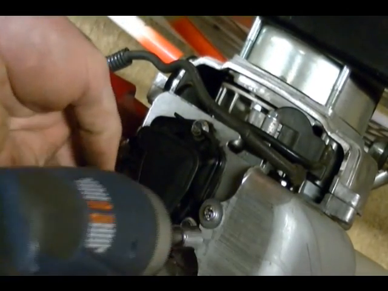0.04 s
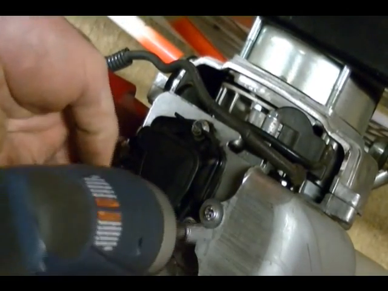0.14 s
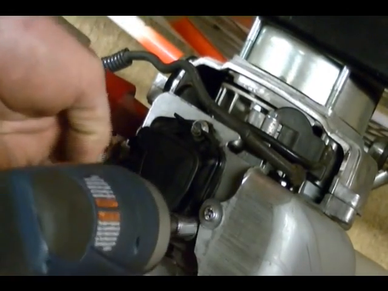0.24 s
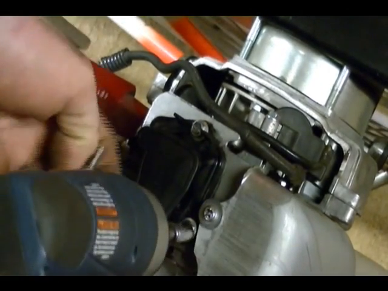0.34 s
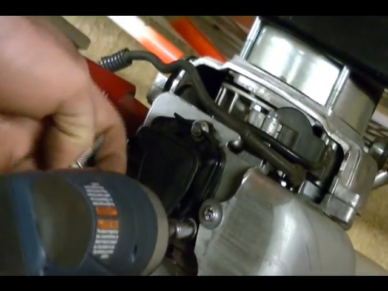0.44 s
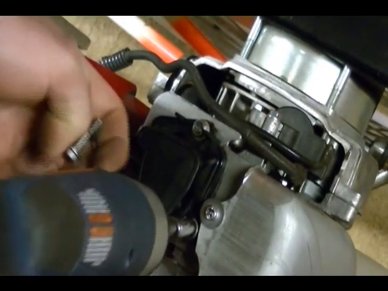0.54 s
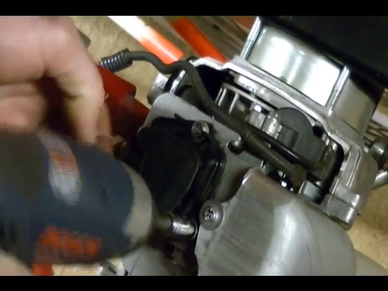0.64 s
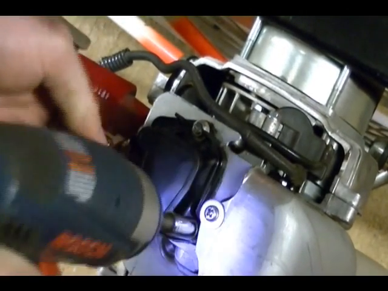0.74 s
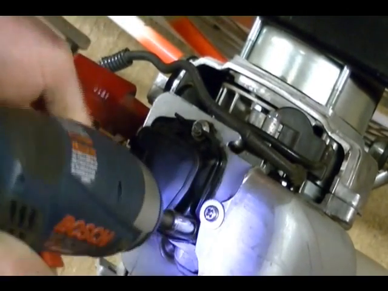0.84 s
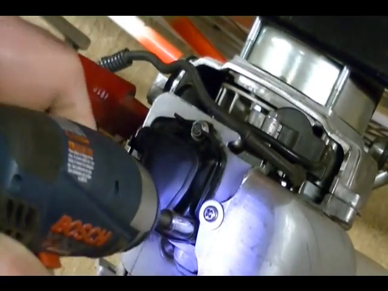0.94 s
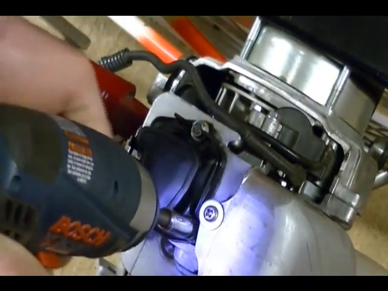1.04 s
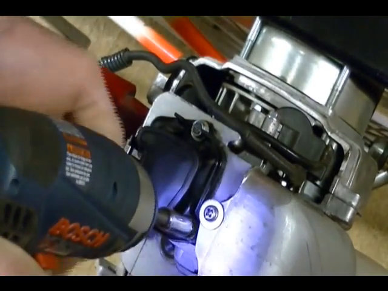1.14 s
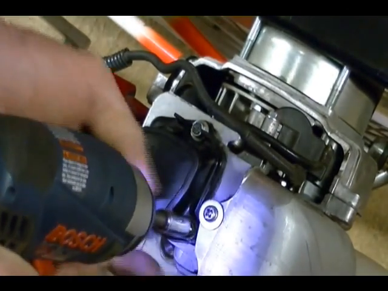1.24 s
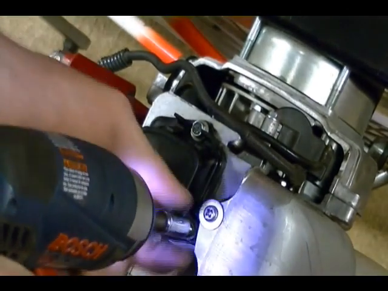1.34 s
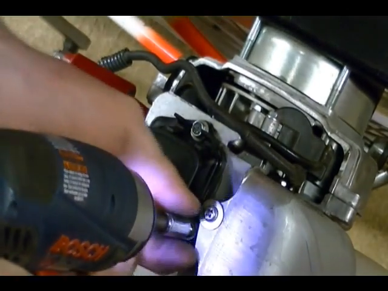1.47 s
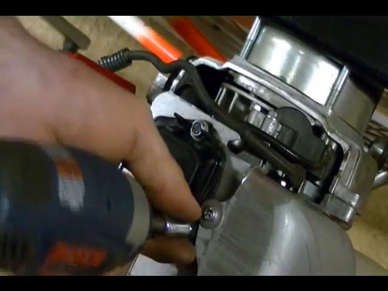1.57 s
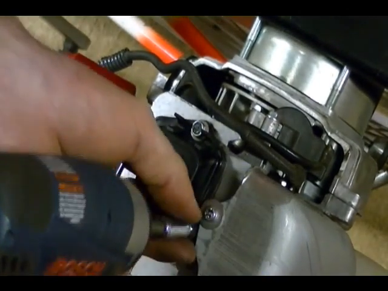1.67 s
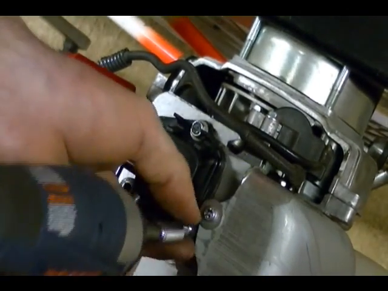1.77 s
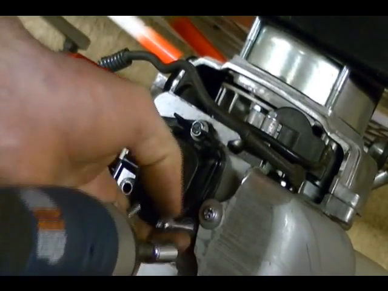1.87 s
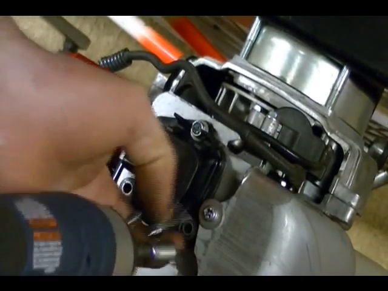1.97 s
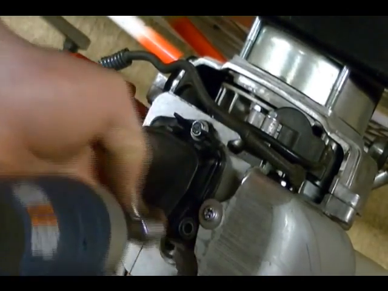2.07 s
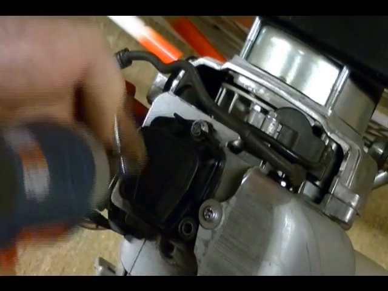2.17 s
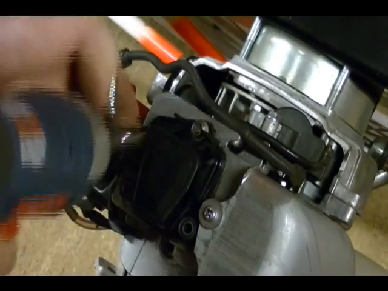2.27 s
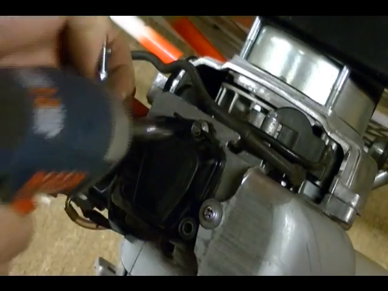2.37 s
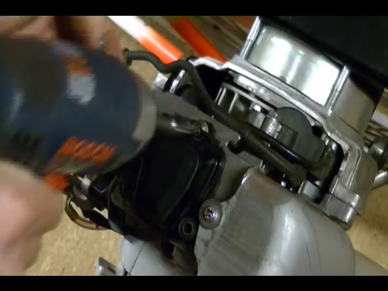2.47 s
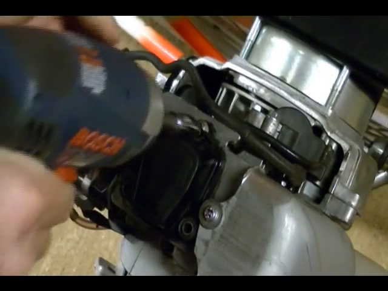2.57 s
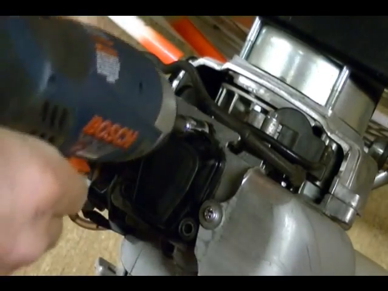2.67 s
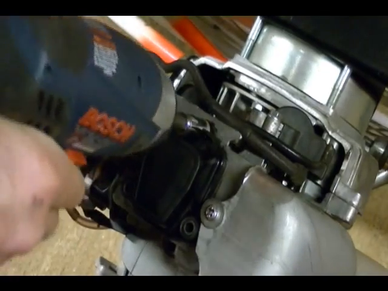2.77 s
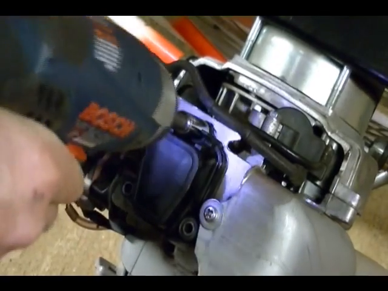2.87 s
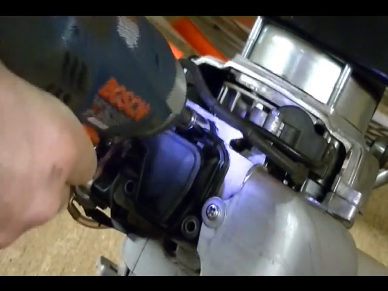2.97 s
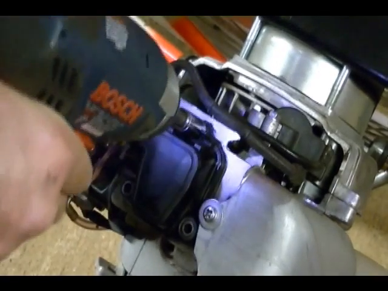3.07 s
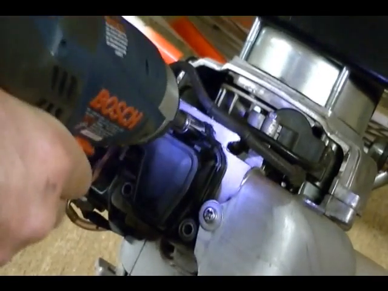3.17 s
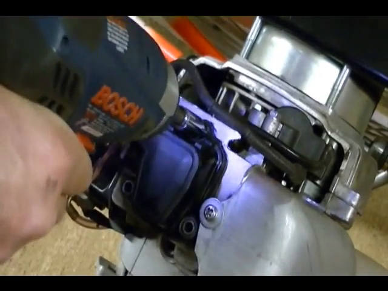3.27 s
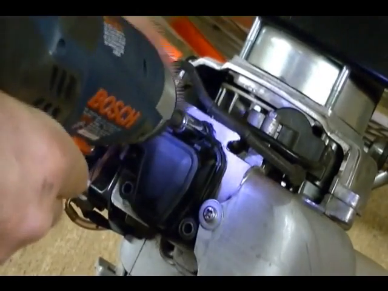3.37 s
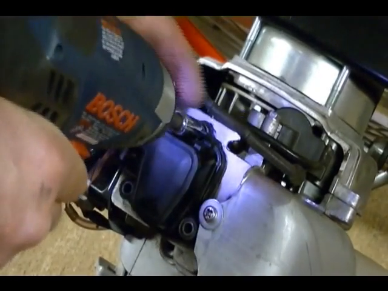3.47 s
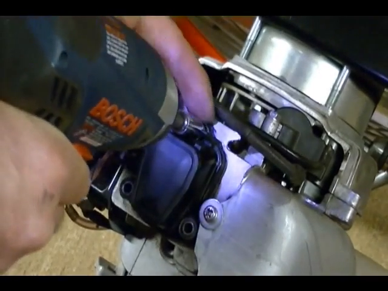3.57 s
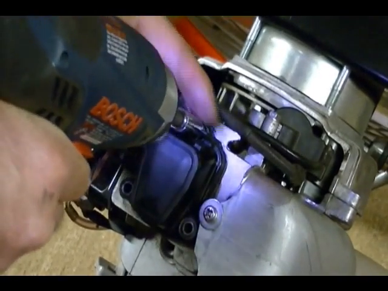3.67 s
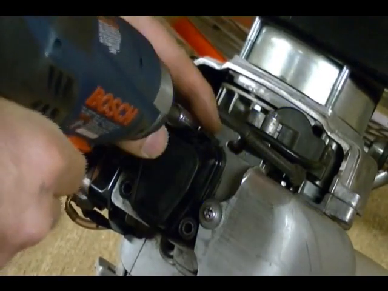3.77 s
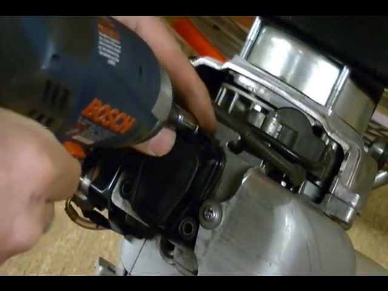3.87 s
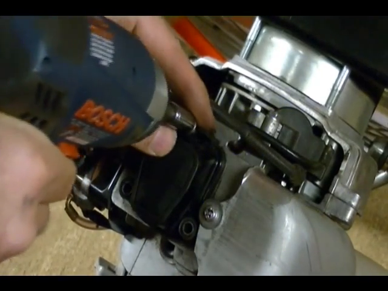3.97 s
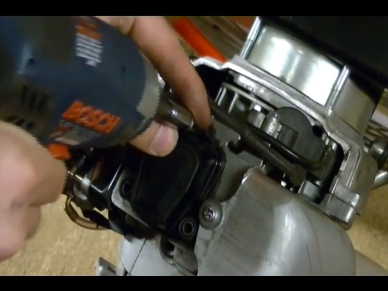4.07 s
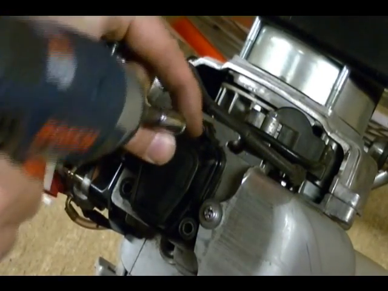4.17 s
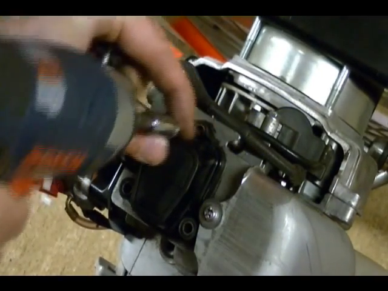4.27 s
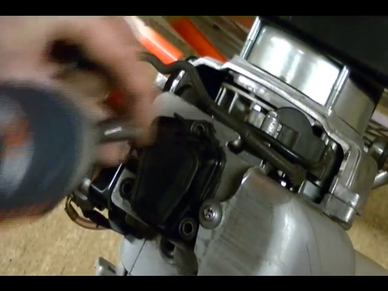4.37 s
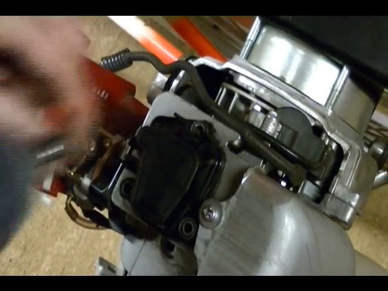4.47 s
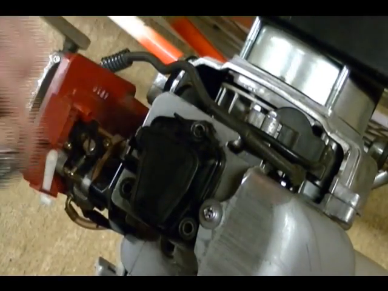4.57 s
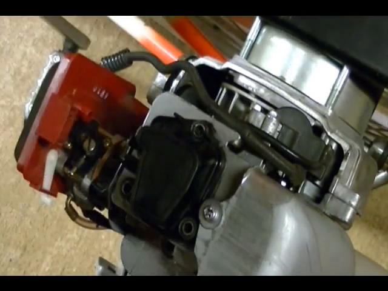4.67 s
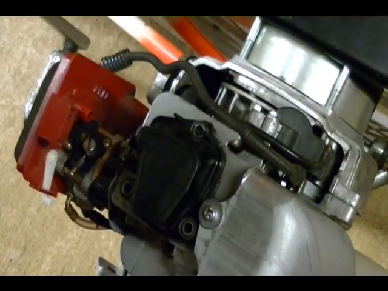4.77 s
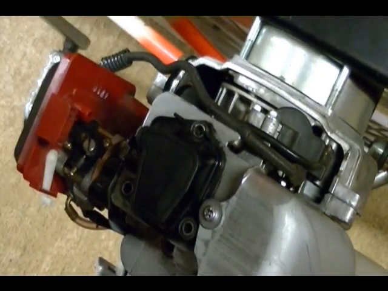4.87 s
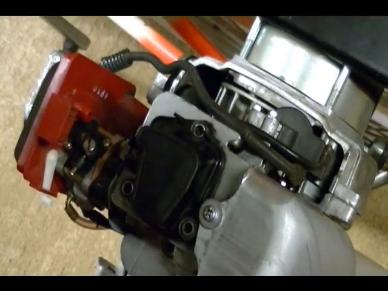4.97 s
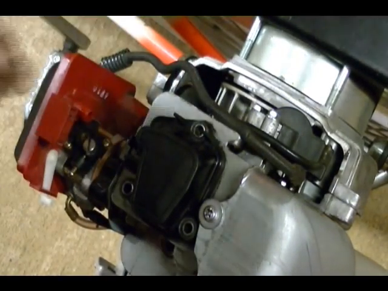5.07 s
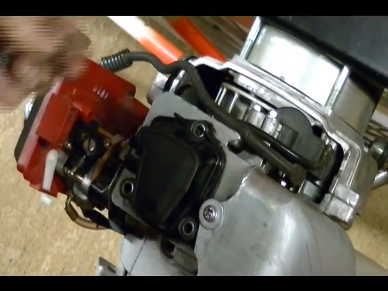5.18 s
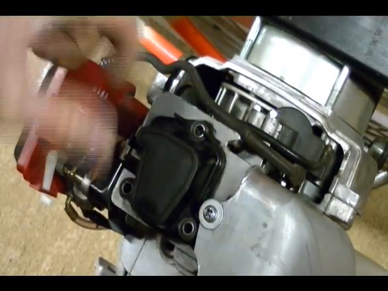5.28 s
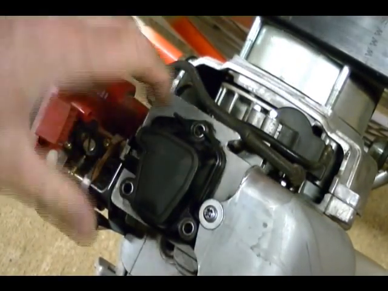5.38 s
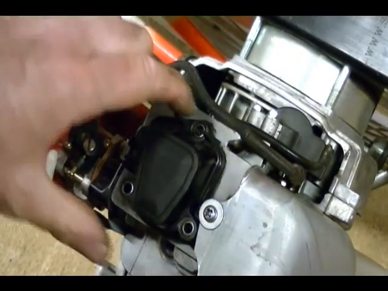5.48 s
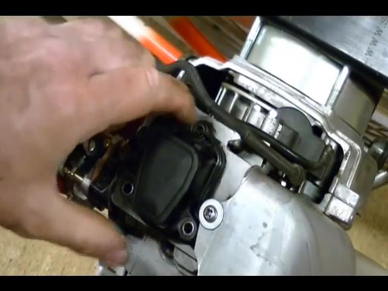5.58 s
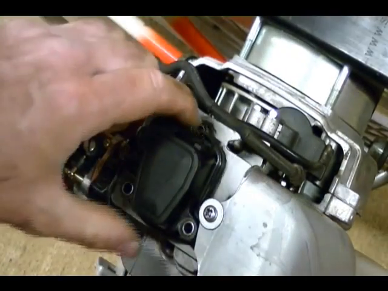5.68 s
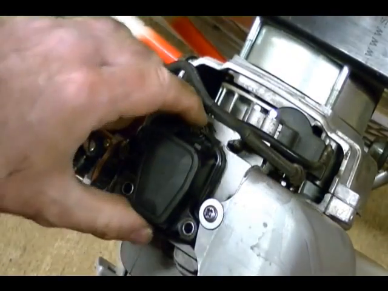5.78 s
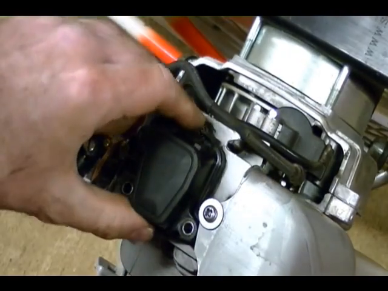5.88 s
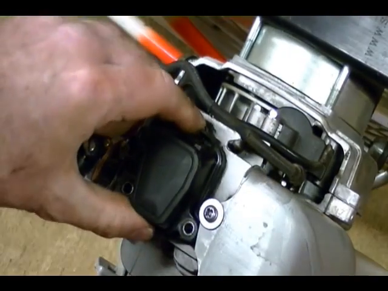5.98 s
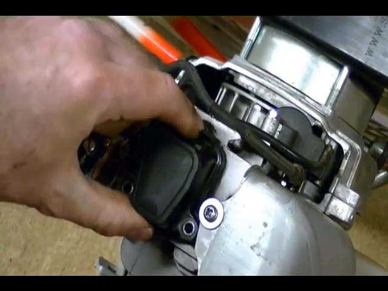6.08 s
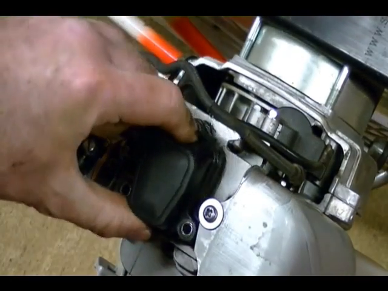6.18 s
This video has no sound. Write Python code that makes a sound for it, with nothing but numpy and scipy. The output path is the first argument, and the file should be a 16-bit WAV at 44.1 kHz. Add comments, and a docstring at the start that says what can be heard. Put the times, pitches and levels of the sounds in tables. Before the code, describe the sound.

Close up in a workshop, a socket clinks on metal, a power drill grinds, whirs and brakes twice, then is set down with a brief scrape.

```python
"""A cordless drill backs two small bolts out of an engine cover: loaded gears grind in jerks, the thread
cracks free, and a harmonic gear whine with tooth chatter climbs to speed, then brakes to a clunk.
Socket and bolts clink as struck steel modes; the plastic housing ticks; the drill slides by stick-slip
onto a bench. Hands rub softly, over workshop air, low rumble, mains hum and a short room tail.
The close microphone's gain drops at once on loud peaks and slowly recovers."""
import sys
import numpy as np
from scipy import signal
from scipy.fft import rfft, irfft, next_fast_len
from scipy.io import wavfile
from scipy.ndimage import uniform_filter1d, map_coordinates

SR = 44100
rng = np.random.default_rng(int(sys.argv[2]) if len(sys.argv) > 2 else 0)


def to_wav(sig):
    """Store sig (one row per channel, or 1-D mono) as 16-bit WAV at the path in sys.argv[1].

    Samples outside -1..1 are clipped; the rate is SR.
    """
    pcm = np.clip(np.atleast_2d(sig), -1, 1) * 32767
    pcm = np.round(pcm).astype(np.int16)
    wavfile.write(sys.argv[1], SR, pcm.T)  # frames by channels


N = 274302
TIME = np.arange(N) / SR


def amp(db):
    """Level law: decibels to amplitude gain."""
    return 10 ** (np.asarray(db) / 20)


def unit(x):
    """Normalization: x scaled to rms 1."""
    return x / np.sqrt(np.mean(x ** 2) + 1e-20)


def along(points, hz):
    """Interpolation of (frequency [Hz], value) points on a logarithmic frequency axis."""
    f, v = np.transpose(points)
    return np.interp(np.log(hz + 1), np.log(f + 1), v)


def swell(rows):
    """Envelope linear in dB through (time [s], level [dB]) rows, silent outside them."""
    s, db = np.transpose(rows)
    inside = (TIME >= s[0]) * (TIME <= s[-1])
    return amp(np.interp(TIME, s, db)) * inside


def held(start, end, rise_db_per_s, fall_db_per_s):
    """Exponential growth to gain 1 at start, a hold until end, then exponential decay."""
    before, after = np.maximum(start - TIME, 0), np.maximum(TIME - end, 0)
    return amp(-rise_db_per_s * before - fall_db_per_s * after)


def wobble(rate):
    """Slow random modulation: a smooth curve with rate knots a second."""
    knots = rng.standard_normal(int(N * rate / SR) + 4)
    return map_coordinates(knots, [TIME * rate], order=2)


def filtered(x, response):
    """Linear filtering: the spectrum of x times a response of frequency."""
    m = next_fast_len(len(x) + 4096, True)
    return irfft(rfft(x, m) * response(np.fft.rfftfreq(m, 1 / SR)), m)[:len(x)]


def coloured(x, spectrum):
    """Spectral shaping by (frequency [Hz], gain [dB]) points, brought to rms 1."""
    return unit(filtered(x, lambda hz: amp(along(spectrum, hz))))


def band(count, low_hz, high_hz):
    """Band-limited noise: count samples at rms 1."""
    sos = signal.butter(2, [low_hz, min(high_hz, SR / 2 - 100)], "band", fs=SR, output="sos")
    return unit(signal.sosfilt(sos, rng.standard_normal(count)))


def grains(rate, spread_db):
    """Random impulse train: tiny contacts of uneven size and either sign, rate a second on average."""
    hits = (rng.random(N) < rate / SR) * rng.choice([-1, 1], N)
    return hits * amp(spread_db * rng.standard_normal(N))


def resonant(x, modes, boost_db):
    """Forced resonance: x plus its ringing in (centre [Hz], width [Hz], level [dB]) modes."""
    def response(f):
        total = 1
        for centre, width, db in modes:
            mode = 1j * f * width / (centre * centre - f * f + 1j * f * width)
            total = total + amp(db + boost_db) * mode
        return total
    return filtered(x, response)


def ringing(modes, t):
    """Free decay of struck modes, excited at new strengths for each blow, scaled to peak 1."""
    ring = 0
    for hz, db, t60 in modes:
        decay = amp(db + rng.normal(0, 1.5) - 60 * t / t60)
        ring = ring + decay * np.sin(2 * np.pi * hz * t + rng.uniform(0, 2 * np.pi))
    return ring / np.abs(ring).max()


def add(track, s, sound):
    """Superposition: mix a sound into the track at s seconds."""
    part = track[max(round(s * SR), 0):][:len(sound)]
    part += sound[:len(part)]


# decay of the workshop's echo: (frequency [Hz], t60 [s])
ROOM_DECAY = [(200, 0.69), (2000, 0.48), (5000, 0.38), (14000, 0.15)]


def room(x):
    """Reverberation: x convolved with a noise tail that dies fastest in the treble."""
    hz, _, z = signal.stft(rng.standard_normal(SR * 3 // 4), SR, nperseg=256)
    t = np.arange(z.shape[1]) * 128 / SR  # frame times [s]
    decay = amp(-60 * t / along(ROOM_DECAY, hz)[:, None])
    tail = signal.istft(z * decay, SR, nperseg=256)[1]
    delayed = np.pad(tail / np.linalg.norm(tail), (round(.006 * SR), 0))  # first echo after 6 ms
    wet = signal.fftconvolve(x, delayed)[:N]
    tone = [(300, 2.5), (2000, 3.5), (6000, -1.5), (14000, -0.5)]
    return filtered(wet, lambda f: amp(along(tone, f)))


# spectrum of the workshop air: (frequency [Hz], gain [dB])
AIR_SPECTRUM = [(76, -31), (130, -6.5), (363, -12), (394, -14), (481, -15), (780, -15.5), (1170, -20),
                (1820, -21), (7300, -29), (16000, -35)]
# mains hum lines, before a common trim: (frequency [Hz], rms level [dB])
HUM_LINES = [(242.2, -67), (360.7, -68), (479.1, -71.5), (597.5, -73), (839.8, -80.5), (1200, -73)]
# spells in which the low rumble is stronger: (start [s], end [s])
RUMBLE_SPELLS = [(0, 1.6), (3.64, 6.22)]
AIR_DB, HUM_TRIM_DB = -58, -0.5
RUMBLE_DB, SPELL_DB, SPELL_DB_PER_S = -70.5, -63.5, 90  # between spells, during them, speed of change


def background():
    """Stationary noise and tones: workshop air, low rumble that swells in spells, and mains hum."""
    hum = 0
    for hz, db in HUM_LINES:
        level = amp(db + 0.19 * wobble(2.55)) * np.sqrt(2)
        hum = hum + level * np.sin(2 * np.pi * hz * TIME + 0.17 * wobble(1.8))
    spells = sum(held(start, end, SPELL_DB_PER_S, SPELL_DB_PER_S) for start, end in RUMBLE_SPELLS)
    rumble_spectrum = [(15, -33.5), (30, -25), (70, -3), (120, -2.5), (170, -6.0), (300, -9), (900, -71)]
    rumble = coloured(rng.standard_normal(N), rumble_spectrum)
    rumble = rumble * np.maximum(amp(RUMBLE_DB), amp(SPELL_DB) * spells)
    air = amp(AIR_DB) * coloured(rng.standard_normal(N), AIR_SPECTRUM)
    return air + rumble + amp(HUM_TRIM_DB) * hum


# hands rub over the tool and the engine: (start [s], end [s], mid-stroke level [dB])
RUBS = [(0.66, 0.756, -46.5), (1.77, 1.882, -51.5), (2.554, 2.64, -55), (2.832, 2.865, -42.5),
        (4.172, 4.249, -61), (4.601, 5.019, -61), (6.105, 6.208, -69)]


def rubs():
    """Friction noise: skin brushes over plastic as many tiny contacts, each stroke growing to its end."""
    strokes = sum(swell([(start, db - 3.5), ((start + end) / 2, db), (end, db + 1.5)])
                  for start, end, db in RUBS)
    skin = [(200, -19), (800, 0), (1900, 3.5), (3200, -2.0), (4800, 0.0), (8000, -11), (15000, -18)]
    return strokes * coloured(grains(2500, spread_db=4), skin)


FIDGET_PER_S, FIDGET_DB, FIDGET_HZ = 10, 13.5, 5000  # rate, mean peak above the rub, band position


def fidgets():
    """Random impacts: up to two faint taps in a rub, as (time [s], peak [dB], band position [Hz])."""
    found = []
    for start, end, db in RUBS:
        for _ in range(round(min(end - start, .2) * FIDGET_PER_S)):
            found.append((rng.uniform(start, end), db + FIDGET_DB + rng.normal(0, 2), FIDGET_HZ))
    return found


# light dry taps of the plastic housing: (time [s], peak level [dB], band position [Hz])
TAPS = [(0.181, -31.5, 3600), (0.2054, -34, 3600), (1.8103, -24, 4760), (1.8413, -28, 4020),
        (2.0932, -32, 4440), (2.3205, -28.5, 4100), (2.8526, -12.5, 5250), (3.8064, -24, 4056),
        (3.8238, -32, 4390), (3.8379, -25.5, 4270), (3.8936, -22.5, 5150), (3.912, -30.5, 4180),
        (4.571, -37, 3600), (4.605, -44, 4480), (4.978, -33.5, 9300), (4.9995, -28.5, 9300),
        (5.0384, -30.5, 3300), (5.056, -32, 9600), (5.1068, -29, 9296)]


def taps():
    """Heavily damped impact: plastic and fingernails tick as band noise with hardly any ring."""
    out, t = np.zeros(N), np.arange(SR // 20) / SR
    fade = amp(-60 * t / 0.005) + amp(-19 - 60 * t / 0.057)
    for s, db, hz in list(TAPS) + fidgets():
        tick = band(len(t), max(hz - 2300, 900), hz + 2800) * fade
        add(out, s, amp(db) * tick / np.abs(tick).max())
    return out


# the drill touches down, then slides: (start [s], end [s], scrape level [dB])
SLIDES = [(5.044, 5.043, -44.5), (5.144, 5.217, -32.3)]
# resonances of the bench: (centre [Hz], width [Hz], level [dB])
BENCH_MODES = [(1470, 120, -12), (1950, 73, -5), (2440, 55, 2), (3010, 110, 4.5)]
# spectrum of the scrape: (frequency [Hz], gain [dB])
BENCH_SPECTRUM = [(88, -55), (150, -28), (243, -13.5), (386, -22), (624, -13), (674, -13.5), (1490, -4.5),
                  (1730, -5), (1980, -2.5), (2970, -11.5), (3600, -15), (6300, -19.5), (15000, -40)]
SLIDE_RISE_DB_PER_S, SLIDE_FALL_DB_PER_S = 503, 272  # how fast each push builds and dies


def slide():
    """Stick-slip friction: the battery foot jerks over the wooden bench and excites its modes."""
    slips = grains(3000, spread_db=0.5) * amp(0.99 * wobble(160))
    push = sum(amp(db) * held(start, end, SLIDE_RISE_DB_PER_S, SLIDE_FALL_DB_PER_S)
               for start, end, db in SLIDES)
    scrape = push * coloured(resonant(slips, BENCH_MODES, boost_db=-3.5), BENCH_SPECTRUM)
    # a loose steel part on the bench is shaken and sings on
    return resonant(scrape, [(2007, 11, 6.5)], boost_db=-2.5)


# socket and bolts touch metal: (time [s], level before a common trim [dB], relative knock level [dB],
# rebounds [count, rounded; -1 leaves the touch out])
CLINKS = [(0.002, -25, -8, 0), (0.018, -21, -14, 2), (0.0707, -20, -10, 1), (0.1015, -22, -2, 0),
          (0.3164, -19, -12, 1.5), (0.4706, -28, -2, 1), (0.6172, -26, -2, 1), (0.7226, -14.5, -14, 0),
          (1.7142, -29, 0.5, 0), (1.8105, -34, 0, 0), (1.8651, -25.5, -5, 0), (1.8765, -19, -7.5, 1.5),
          (1.902, -24, -14, 3), (2.5195, -33, 14, 0), (2.5328, -26, -3, 1), (2.6625, -18.5, -8, 0),
          (2.6992, -21, -9, 0), (2.7047, -16, -4.5, -1), (2.821, -39, 7, 0.5), (2.8648, -15, -12, 2)]
REBOUND_S, REBOUND_LOSS_DB = 0.006, 0.5  # time in the air, loss per rebound
TICK_DB, REBOUND_DULL_DB = -5.5, 12.5  # bright edge of a first touch, its loss on every rebound


def contacts():
    """Bouncing impact: touches and weaker, duller rebounds (time [s], level, knock, tick [dB])."""
    touches = []
    for s, db, knock_db, count in CLINKS:
        for k in range(round(count) + 1):
            tick_db = TICK_DB - REBOUND_DULL_DB * (k > 0)
            touches.append((s + k * REBOUND_S, db - k * REBOUND_LOSS_DB, knock_db, tick_db))
    return touches


# modes of socket and bolt, before the hand's damping: (frequency [Hz], level [dB], t60 [s])
STEEL_MODES = [(1815, -1.5, 0.13), (3100, -16, 0.063), (3600, -12, 0.085), (3553, -19.5, 0.34),
               (4240, -0.5, 0.44), (4600, 6.5, 0.057), (4892, 2.5, 0.1), (5180, -0.5, 0.1),
               (6320, -19, 0.36), (8300, -6, 0.23), (8000, -4, 0.25)]
# a loose bolt pings in the fingers: (time [s], level [dB])
PINGS = [(1.715, -29), (1.807, -35), (1.866, -30.5)]
# modes of the loose bolt, before the fingers' damping: (frequency [Hz], level [dB], t60 [s])
BOLT_MODES = [(1602, -3, 0.13), (2237, -9, 0.14), (2640, 0, 0.1), (3160, -17, 0.3), (5835, -34, 0.52)]
RATTLE_T60_S = 0.087  # decay of the engine's parts


def clinks():
    """Impact and modal decay: steel snaps, rattles briefly in the engine's parts and rings the socket."""
    out, t = np.zeros(N), np.arange(SR // 4) / SR
    fade = amp(-60 * t / 0.006) + amp(-2.5) * amp(-60 * t / RATTLE_T60_S)
    grip = amp(-60 * t / 0.18)  # the hand damps the steel
    for s, db, knock_db, tick_db in contacts():
        knock = band(len(t), 970, 2660) + amp(-15.0) * band(len(t), 230, 930)
        tick = band(len(t), 7600, 10750)
        body = band(len(t), 2870, 6500) + amp(knock_db) * knock + amp(tick_db) * tick
        ring = amp(3.5) * grip * ringing(STEEL_MODES, t)
        add(out, s, amp(db - 10.5) * (body * fade + ring))
    for s, db in PINGS:
        add(out, s, amp(db - 60 * t / 0.32) * ringing(BOLT_MODES, t))
    return out


# one pull of the trigger per bolt: (socket grips [s], bolt comes free [s], trigger eased [s], brake [s],
# whine as it comes free [Hz], running level [dB], peak grind level [dB])
RUNS = [(0.724, 0.775, 1.366, 1.5, 820.6, -21, -16), (2.868, 2.916, 3.672, 3.722, 768.7, -21.5, -19.5)]
FREE_HZ, SPIN_UP_S = 1030.3, 0.143  # no-load whine (three cycles per motor turn), spin-up time constant
EASE_HZ_PER_S, BRAKE_HZ_PER_S = 1180, 2500  # fall as the trigger is eased, further fall under the brake
# the gearbox comes in, calms as the thread loosens, dies away
START_DB_PER_S, LOOSEN_DB_PER_S, BRAKE_DB_PER_S = 650, 1.5, 534


def motor():
    """First-order spin-up: whine pitch and gearbox gain near no-load speed, sag on easing, then brake."""
    hz, gain = np.zeros(N), np.zeros(N)
    for grip, free, ease, brake, first_hz, db, _ in RUNS:
        spun, eased, braked = (np.maximum(TIME - s, 0) for s in (free, ease, brake))
        speed = FREE_HZ - (FREE_HZ - first_hz) * np.exp(-spun / SPIN_UP_S)
        speed = speed - EASE_HZ_PER_S * eased - BRAKE_HZ_PER_S * braked
        hz = np.where(TIME >= grip, np.maximum(speed, 0), hz)
        running = amp(db - LOOSEN_DB_PER_S * spun)
        gain += (TIME >= grip) * running * held(free, brake, START_DB_PER_S, BRAKE_DB_PER_S)
    return hz, gain


WIND_UP_DB = 10.5  # growth of the grinding from grip to break-away
BRAKE_GRIND_DB, BRAKE_GRIND_S = -26, 0.012  # braking torque's grind, this long either side of the brake


def load():
    """Torque loading: the grind winds up until the bolt gives, and returns briefly under the brake."""
    total = 0
    for grip, free, _, brake, _, _, db in RUNS:
        wind_up = swell([(grip, db - WIND_UP_DB), (free, db)])
        braking = swell([(brake - BRAKE_GRIND_S, BRAKE_GRIND_DB - 6), (brake + BRAKE_GRIND_S, BRAKE_GRIND_DB)])
        total = total + wind_up + braking
    return total


TAUT_DB = 3.5  # drop in chatter while accelerating torque holds the teeth together


def slack():
    """Gear backlash: tooth chatter returns as the motor stops accelerating."""
    taut = sum((TIME >= grip) * np.exp(-np.maximum(TIME - free, 0) / SPIN_UP_S) for grip, free, *_ in RUNS)
    return amp(-TAUT_DB * taut)


WHISTLE_DB, WHISTLE_S = -46, 0.022  # the speed controller, just before the socket grips


def trigger():
    """Magnetic excitation: the chopped motor current whistles before the shaft moves."""
    gate = sum(swell([(grip - WHISTLE_S, WHISTLE_DB - 4), (grip, WHISTLE_DB)]) for grip, *_ in RUNS)
    return gate * np.sin(2 * np.pi * 9150 * TIME + .5 * wobble(300))


STOP_DB, STOP_T60_S = -40, 0.44  # the braked chuck's clunk and its decay


def stops():
    """Backlash impact: as the motor brakes, the heavy chuck knocks in the slack, as decaying noise."""
    out, t = np.zeros(N), np.arange(SR // 2) / SR
    for _, _, _, brake, *_ in RUNS:
        add(out, brake, band(len(t), 560, 1180) * amp(STOP_DB - 60 * t / STOP_T60_S))
    return out


# a bolt jerks or cracks free: (time [s], level [dB], thump of the engine on its mount [dB])
CRACKS = [(0.7735, -1.5, -29), (2.8692, -13.5, -50.5), (2.9143, 3, -53)]
# resonances of the engine casting: (centre [Hz], width [Hz], level [dB])
CASTING_MODES = [(1090, 47, -2), (1940, 79, -3), (3640, 34, -27), (4370, 215, -5), (4730, 60, -8),
                 (5540, 39, -12)]
# spectrum of the grinding: (frequency [Hz], gain [dB])
GRIND_SPECTRUM = [(82, -60), (140, -16), (479, -22), (1170, -1.5), (1370, -8.5), (1840, -1.5), (2160, -8.5),
                  (4770, -8.5), (6960, -16.5), (8480, -11.5), (13100, -25.5), (16000, -38)]


def strain():
    """Stick-slip under torque: loaded gears grind harder in jerks until the thread lets go with a crack."""
    jerks = grains(9000, spread_db=2) * amp(2.4 * wobble(320))
    out = load() * coloured(resonant(jerks, CASTING_MODES, boost_db=-5.5), GRIND_SPECTRUM)
    t = np.arange(SR // 10) / SR
    for s, db, thump_db in CRACKS:
        snap = band(len(t), 990, 8300) * amp(-60 * t / 0.0099)
        snap = snap / np.sqrt(np.mean(snap[:SR // 500] ** 2))  # rms 1 over its first 2 ms
        # the casting rattles on
        shudder = coloured(rng.standard_normal(len(t)), GRIND_SPECTRUM) * amp(-11.5 - 60 * t / 0.092)
        thump = amp(thump_db) * np.sin(2 * np.pi * 55 * t) * amp(-60 * t / 0.019)
        add(out, s, amp(db) * (snap + shudder) + thump)
    return out


# resonances of the plastic shell: (centre [Hz], width [Hz], level [dB])
HOUSING_MODES = [(1100, 130, -5), (1700, 180, -5), (1880, 160, -5), (8250, 800, -4), (2680, 330, 1),
                 (2930, 120, -3.5), (6760, 190, 5.5), (11530, 250, 5.5), (13100, 330, 3.5)]
# spectrum of the gearbox: (frequency [Hz], gain [dB])
GEARBOX_SPECTRUM = [(150, -68.5), (250, -37), (831, -16), (1010, -12.5), (1470, -11), (2020, -7.5),
                    (2320, -8), (3010, -8), (3460, -7.5), (5160, 1), (5630, -4.5), (10000, -13),
                    (11700, -15), (13900, -13.5), (16000, -28)]


def housing(x):
    """Source and resonator: sound leaves through the plastic shell, so lines swell near its resonances."""
    return coloured(resonant(x, HOUSING_MODES, boost_db=-3.5), GEARBOX_SPECTRUM)


# harmonics of the gear whine: (multiple of the whine [ratio], level [dB])
GEAR_LINES = [(1, -11), (2, -12.5), (3, -4), (4, -7), (5, -10), (6, -12), (7, -16), (8, -12), (9, -9.5),
              (10, -22.5), (11, -18), (12, -10)]
# bearings and slower gear stages: (multiple of the whine [ratio], level [dB])
SIDE_LINES = [(3.32, -18.5), (3.6, -18), (3.93, -16), (4.6, -16.5), (4.93, -16), (5.08, -13), (5.31, -27),
              (6.5, -14), (6.57, -22.5), (7.3, -13.5), (8.64, -15), (11.3, -5.5), (11.64, -9), (13.3, -23)]


def gearbox():
    """Gear-mesh excitation: teeth sing in lines tied to the motor speed and chatter in between."""
    whine_hz, gain = motor()
    hz = whine_hz * (1 + 0.00096 * wobble(45))
    phase = 2 * np.pi * np.cumsum(hz) / SR
    # the planet carrier, about 13 times slower than the whine, swings the loudness of every harmonic
    carrier = phase * .074
    lines = sum(amp(db) * np.sin(k * phase + 1.2 * wobble(40)) for k, db in SIDE_LINES)
    for k, db in GEAR_LINES:
        swing = 1 + 0.5 * np.cos(carrier + rng.uniform(0, 2 * np.pi)) + 0.47 * wobble(260)
        lines = lines + amp(db + 3.0 * wobble(14)) * swing * np.sin(k * phase)
    # the chatter pulses with each whine cycle and surges with the play in the teeth
    teeth = grains(14000, spread_db=0.5) * (1 + 0.16 * np.cos(phase)) * amp(1.0 * wobble(170))
    chatter = amp(-2.7) * slack() * housing(teeth)
    return gain * (chatter + amp(-8.8) * housing(lines))


def scene():
    """Superposition of direct sound and reverberation: all sources at one close microphone."""
    drill = gearbox() + strain() + stops() + trigger()
    metal, ticks, scrape = clinks(), taps(), slide()
    echo = room(amp(-12) * drill + amp(-9.5) * metal + amp(-10.0) * ticks + amp(-13.0) * scrape)
    mono = drill + metal + ticks + scrape + rubs() + echo + background()
    return np.array([mono, mono])


TOP_HZ = 15850  # nothing passes above this


def record(dry, threshold_db=-15, release_db=31, ceiling=0.34):
    """Peak-driven gain control: a fast drop, a slow rise in dB a second, then soft limiting and low-pass."""
    x = dry[0]
    level_db = 10 * np.log10(np.abs(uniform_filter1d(x ** 2, size=90)) + 1e-12)
    recovery = release_db * TIME
    excess_db = np.maximum(level_db - threshold_db, 0)
    duck_db = np.maximum.accumulate(excess_db + recovery) - recovery
    pole = np.exp(-1 / (0.00056 * SR))  # the gain needs about a millisecond to fall
    x = x * amp(-signal.lfilter([1 - pole], [1, -pole], duck_db))
    x = x / (1 + (x / ceiling) ** 4) ** (1 / 4)  # peaks that slip through are rounded off
    x = filtered(x, lambda hz: hz < TOP_HZ)
    return np.array([x, x])


dry = scene()
out = record(dry)
to_wav(out)
```